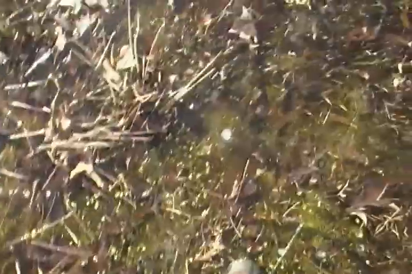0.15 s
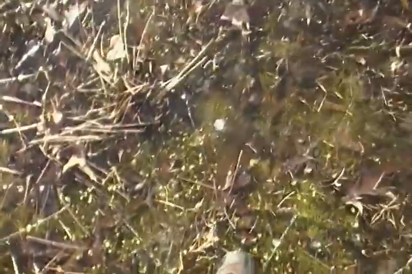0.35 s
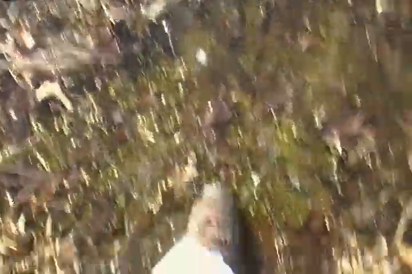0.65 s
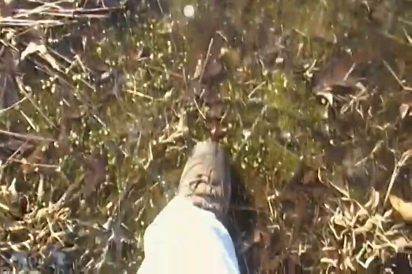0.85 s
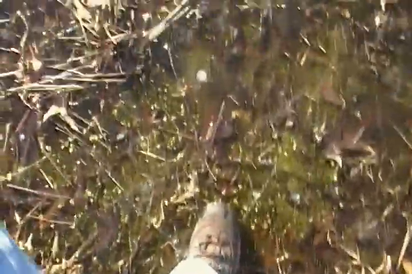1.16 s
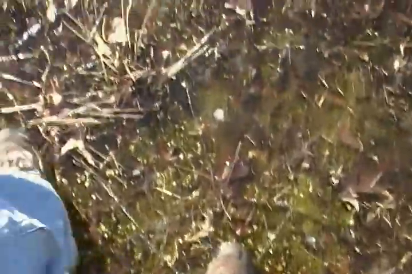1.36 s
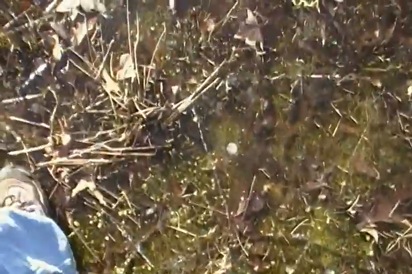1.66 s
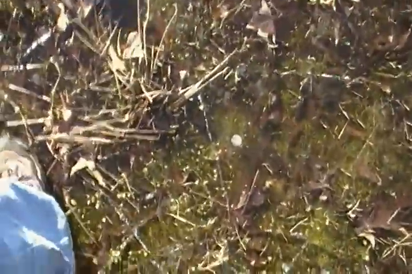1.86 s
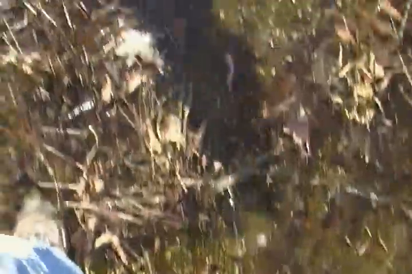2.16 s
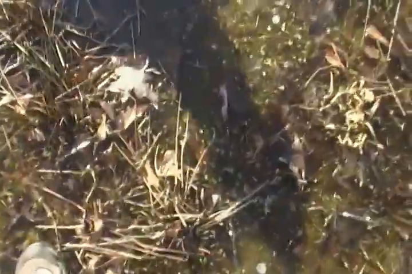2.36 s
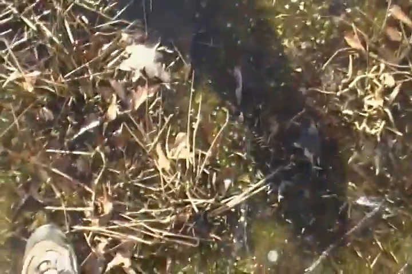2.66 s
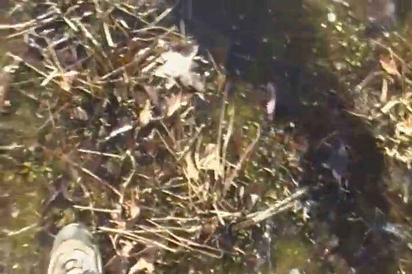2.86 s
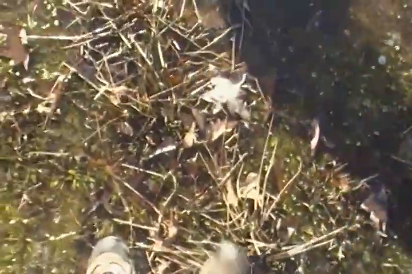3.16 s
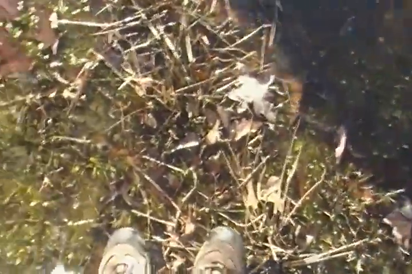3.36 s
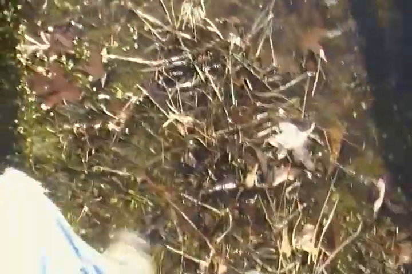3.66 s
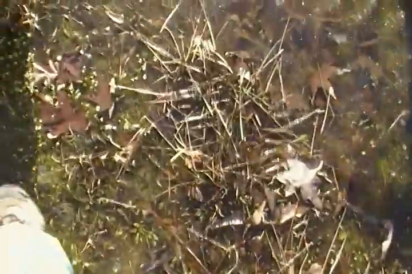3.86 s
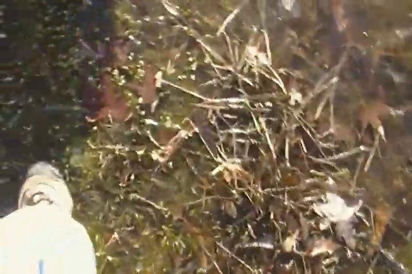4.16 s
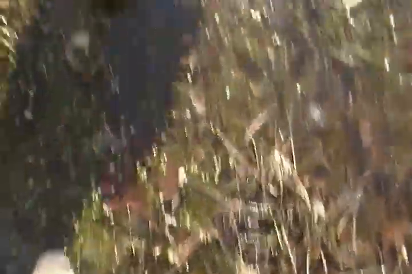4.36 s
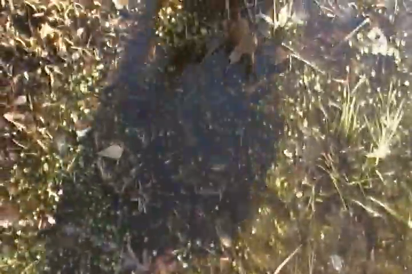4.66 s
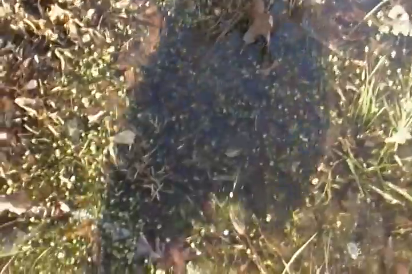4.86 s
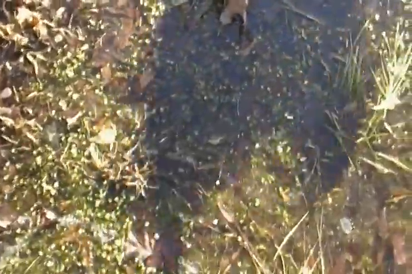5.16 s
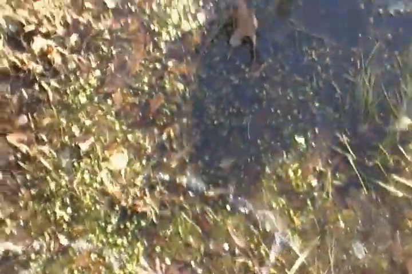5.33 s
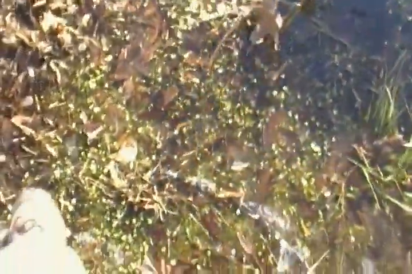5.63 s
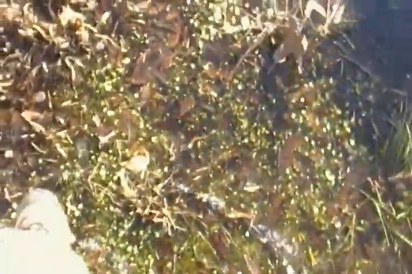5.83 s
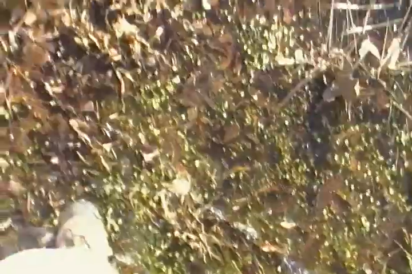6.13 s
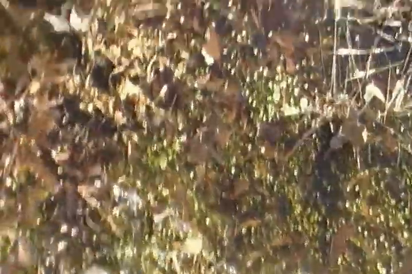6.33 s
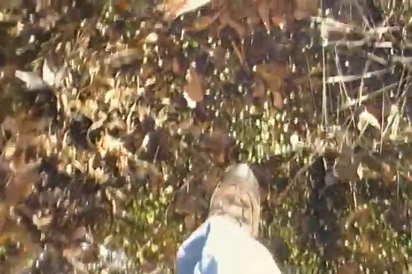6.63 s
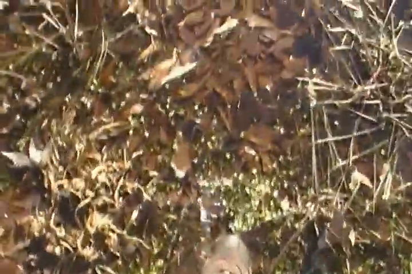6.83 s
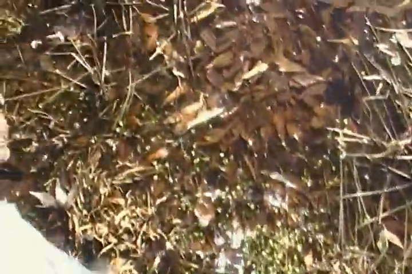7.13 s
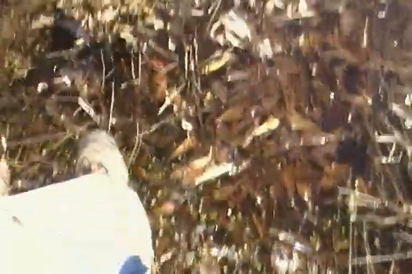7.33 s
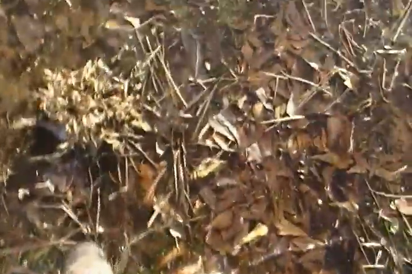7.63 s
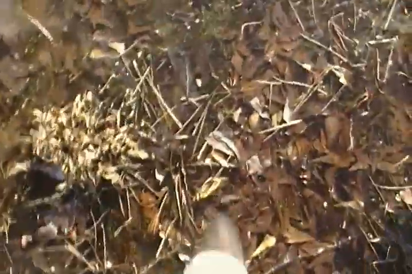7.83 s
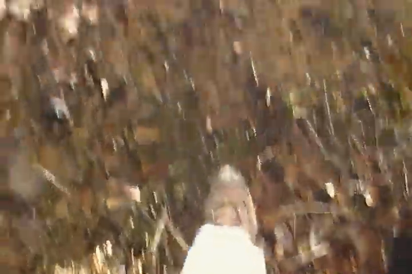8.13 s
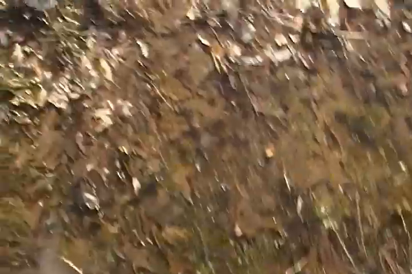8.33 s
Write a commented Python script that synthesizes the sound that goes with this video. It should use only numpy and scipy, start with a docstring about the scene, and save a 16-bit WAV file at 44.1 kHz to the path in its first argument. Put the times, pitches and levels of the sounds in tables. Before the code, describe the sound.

Outdoors on a shallow frozen pond, heard from just above the boots in wide stereo. A low gust brushes the microphone at the start as ice crackles densely until about 0.6 s, with sharp snaps. A hard boot clack lands near 0.8 s, another at 1.2; crunches swell around 1.25 and 1.7, then nearly quiet with tiny dry ticks until 2.2. A strong crack at 2.3 and a cluster of clacks with a scuff at 2.55 lead to a short lull around 3. From 3.2 the crushing is almost continuous, full of short falling cracks, crumbs and bright fizz, fizziest near 7. A faint low hum hides in the distant rumble mid-way. Low wind thumps begin at 5.7 and grow strong from 7.5 to the end. Crunching thins at 7.7-8.1, then a final clack, rasping scrape and crunch at 8.1-8.4. The sharpest peaks clip.

```python
"""A shallow pond under thin ice: slow steps, heard from a microphone just above the boots.
Each step crushes the crust: random breaks ring small plates into a dense crackle, with a bright fizz and coarse crumbs.
Larger cracks are short falling chirps, splinters are dry clicks; boots clack, scuff and scrape as shaped noise and blows.
Gusts and a handling bump, both fluctuating low noise, buffet the microphone over a far low rumble with a faint hum.
The sharpest peaks overload the recorder and clip."""
import sys
import numpy as np
from scipy import signal
from scipy.fft import rfft, irfft, next_fast_len
from scipy.io import wavfile
from scipy.ndimage import uniform_filter1d

SR = 44100
rng = np.random.default_rng(int(sys.argv[2]) if len(sys.argv) > 2 else 0)


def inscribe(sig):
    """Save sig as 16-bit PCM at rate SR to the path in sys.argv[1].

    A 1-D sig is mono; a 2-D sig holds one channel per row.
    Samples are clipped to [-1, 1] before scaling.
    """
    pcm = np.round(np.clip(np.atleast_2d(sig).T, -1, 1) * 32767)
    wavfile.write(sys.argv[1], SR, pcm.astype(np.int16))


N = 374320
TIME_S = np.arange(N) / SR
LEFT_RIGHT = np.array([[1], [-1]])


def undb(db):
    """Decibels to gain."""
    return 10 ** (np.asarray(db) / 20)


def unit(x):
    """Scale to rms 1."""
    return x / np.sqrt(np.mean(x ** 2))


def colour(x, points):
    """Shape a spectrum by frequency and dB points, joined along log frequency."""
    hz, db = np.transpose(points)
    size = next_fast_len(N + 4096)
    f = np.maximum(np.fft.rfftfreq(size, 1 / SR), 1)
    gain = undb(np.interp(np.log(f), np.log(hz), db))
    return irfft(rfft(x, size) * gain, size)[..., :N]


def ring(x, hz, q):
    """A damped resonance with gain 1 at its centre; q is at least 0.9."""
    b, a = signal.iirpeak(hz, max(q, 0.9), fs=SR)
    return signal.lfilter(b, a, x)


def butter(x, order, hz, kind):
    """Butterworth low-pass or high-pass."""
    return signal.sosfilt(signal.butter(order, hz, kind, fs=SR, output="sos"), x)


def add(track, s, sound):
    """Mix a sound in at a time in seconds."""
    i = int(np.clip(s * SR, 0, N))
    track[..., i:i + sound.shape[-1]] += sound[..., :N - i]


def swell(s, rise_s, hold_s, fall_s):
    """Exponential rise to full strength at s, a hold, an exponential fall."""
    near = slice(max(int((s - 1) * SR), 0), int((s + hold_s + 1) * SR))
    rise = (TIME_S[near] - s) / rise_s
    fall = (s + hold_s - TIME_S[near]) / fall_s
    out = np.zeros(N)
    out[near] = np.exp(np.minimum(rise, fall).clip(-30, 0))
    return out


# how far the two microphone ports differ: f/Hz, side gain/dB
PORT_SIDE = [(200, -17.5), (700, -11.5), (1200, -9.5), (2200, -8), (3400, -8.5), (5000, -4.5), (7000, 4.5),
             (8500, 0), (10000, -2), (12500, -0.5)]


def ports(mid, side):
    """Left and right: alike in the bass, mostly unrelated in the treble."""
    return mid + LEFT_RIGHT * colour(side, PORT_SIDE)


def fractures(per_s, spread_db):
    """Random tiny breaks of either sign, a few of them far stronger than the rest."""
    size = undb(spread_db * np.minimum(rng.exponential(size=N), 3.5))
    return (rng.random(N) < per_s / SR) * size * rng.choice([-1, 1], N)


def scatter(breaks, tail_s, share):
    """Each break is followed by a short hiss of splinters."""
    # a leaky sum of break power; tail_s is its decay time
    power = signal.lfilter([1 / (tail_s * SR)], [1, -np.exp(-1 / (tail_s * SR))], breaks ** 2)
    return breaks + share * np.sqrt(power) * rng.standard_normal(N)


def steady(x, window_s):
    """Even out the slow level and keep the grain."""
    power = uniform_filter1d(np.mean(x ** 2, axis=0), int(window_s * SR))
    power = np.abs(uniform_filter1d(power, int(window_s * SR / 2)))
    return x / np.sqrt(power + 1e-12)


# a sole loading the crust: t/s of full weight, build-up/s, hold/s,
# relative crunch level/dB (breaking plates), relative fizz level/dB (fine crystals)
PRESSES = [(0.065, 0.0058, 0.013, -26.5, -28), (0.152, 0.0068, 0.043, -31, -26.5),
           (0.228, 0.04, 0.15, -21.5, -25), (0.462, 0.036, 0.03, -25.5, -22), (0.51, .012, 0.039, -24, -25),
           (0.588, 0.022, 0.047, -36.5, -37), (0.773, 0.0077, 0.019, -27, -28.5),
           (1.01, 0.035, 0.071, -37, -42), (1.156, 0.0077, 0.011, -24.5, -26),
           (1.249, 0.04, 0.063, -24, -23.5), (1.387, .01, 0.011, -28.5, -27.5),
           (1.596, 0.08, 0.073, -27.5, -28), (1.67, 0.022, 0.036, -20, -25),
           (1.75, 0.0048, 0.0078, -29.5, -29), (2.09, 0.048, 0.026, -38, -48),
           (2.233, 0.029, 0.063, -28.5, -39), (2.294, 0.0015, 0.067, -18, -24),
           (2.433, 0.0047, 0.059, -26.5, -29), (2.539, 0.0011, 0.011, -20, -29),
           (2.699, 0.062, 0.069, -22.5, -22), (2.892, .02, 0.074, -34.5, -47.5),
           (3.177, 0.078, 0.011, -30, -39), (3.2, 0.004, 0.053, -21, -24.5),
           (3.272, 0.095, 0.13, -32, -33.5), (3.597, 0.092, 0.078, -22, -25),
           (3.705, 0.023, 0.073, -22, -23.5), (3.837, 0.011, 0.029, -26.5, -25.5),
           (3.914, 0.015, 0.036, -28, -32.5), (4.068, 0.054, 0.082, -20.5, -22.5),
           (4.207, 0.018, 0.026, -27, -25.5), (4.3, .003, 0.0064, -32, -31.5),
           (4.407, 0.033, 0.095, -55, -41.5), (4.61, 0.13, 0.043, -30, -33),
           (4.702, 0.023, 0.063, -17.5, -20.5), (4.843, 0.033, 0.2, -23.5, -22),
           (5.11, 0.034, 0.11, -28, -25.5), (5.305, 0.013, 0.089, -26, -25.5),
           (5.404, 0.024, 0.11, -20.5, -21), (5.617, 0.082, 0.063, -28.5, -23.5),
           (5.782, 0.14, 0.043, -24.5, -21), (5.9, 0.041, 0.03, -26, -26.5),
           (6.16, 0.27, 0.094, -26, -25.5), (6.28, 0.03, 0.061, -20.5, -21),
           (6.403, 0.032, 0.19, -24.5, -23.5), (6.636, 0.093, 0.15, -24.5, -22.5),
           (6.984, 0.09, 0.011, -19, -19.5), (7.055, 0.022, 0.047, -22.5, -17),
           (7.189, 0.12, 0.063, -22.5, -18.5), (7.319, 0.034, 0.13, -23.5, -22.5),
           (7.453, 0.025, 0.13, -28, -23.5), (7.662, 0.028, 0.028, -28, -35),
           (7.772, 0.036, 0.11, -35, -41), (8.128, 0.021, 0.014, -21.5, -22.5),
           (8.306, 0.0036, 0.025, -20.5, -28.5), (8.393, 0.024, 0.1, -26.5, -29.5)]
RELEASE_S, RELEASE_PER_HOLD = 0.022, 0.35  # the longer the press, the longer the crust takes to settle
CREEP_CRUNCH_DB, CREEP_FIZZ_DB = -52.5, -47  # relative levels under a boot at rest


def crushing():
    """Strength of crunch and fizz: the presses add up in power over the creep of the ice."""
    crunch = np.full(N, undb(CREEP_CRUNCH_DB) ** 2)
    fizz = np.full(N, undb(CREEP_FIZZ_DB) ** 2)
    for s, rise, hold, crunch_db, fizz_db in PRESSES:
        power = swell(s, rise, hold, RELEASE_S + RELEASE_PER_HOLD * hold) ** 2
        crunch += undb(crunch_db) ** 2 * power
        fizz += undb(fizz_db) ** 2 * power
    return np.sqrt(crunch), np.sqrt(fizz)


# spectrum of breaking plates: f/Hz, relative level/dB
CRUNCH_COLOUR = [(150, -69), (400, 3), (850, 1), (1200, 2.5), (1600, 6.5), (2200, 6.5), (2800, 5),
                 (4000, 5.5), (5200, -1), (7000, -9), (12000, -20)]
# spectrum of fizzing crystals: f/Hz, relative level/dB
FIZZ_COLOUR = [(2000, -5.5), (4500, 0.5), (6500, -6), (8500, -1.5), (10200, 0.5), (11500, -2.5),
               (13000, -15.5)]


def crust(crush, fizz, plate_q=4.2, plate_share=0.61, crunch_trim_db=-2.0, dense_db=-23,
          slips_per_s=130, slip_s=0.0036, patch_s=0.004):
    """Small plates snap in clusters and ring near shifting pitches; crystals fizz with the same breaks."""
    load = np.clip(crush / undb(dense_db), 0.08, 1)  # a light foot breaks fewer plates
    # the sole drops in sudden slips, each dying away quickly, over an even grind
    jolts = np.abs(fractures(slips_per_s, spread_db=2.0))
    slips = 0.7 + unit(signal.lfilter([1], [1, -np.exp(-1 / (slip_s * SR))], jolts))
    breaks = fractures(per_s=1700, spread_db=1.25) * (rng.random(N) < load) * slips
    # the break moves from patch to patch, each patch spanning neighbouring pitches
    pitches = np.geomspace(900, 5200, 16)
    patch_number = np.cumsum(rng.random(N) < 1 / (patch_s * SR))
    patch = rng.integers(0, len(pitches), N)[patch_number]
    which = (patch + rng.integers(-4, 5, N)) % len(pitches)
    plates = sum(ring(breaks * (which == k), hz, plate_q) / np.sqrt(hz) for k, hz in enumerate(pitches))
    body = plate_share * unit(plates) + unit(scatter(breaks, tail_s=0.0035, share=2.3))
    aside = scatter(breaks * rng.standard_normal(N), tail_s=0.0023, share=0.66)
    crunch = ports(unit(colour(body, CRUNCH_COLOUR)), unit(colour(aside, CRUNCH_COLOUR)))

    fine = breaks + fractures(per_s=2200, spread_db=5.6) * np.sqrt(slips)

    def crystals():
        """One independent grain of fizz on the shared breaks."""
        grains = scatter(fine * rng.standard_normal(N), tail_s=0.016, share=0.56)
        return unit(colour(grains, FIZZ_COLOUR))

    crystal_fizz = ports(crystals(), crystals())
    return steady(crunch, 0.05) * crush * undb(crunch_trim_db) + steady(crystal_fizz, 0.034) * fizz


# coarse crumbs break off by chance, more often and louder the harder the crust is crushed
CRUMBS_PER_S, CRUMB_FULL_DB = 45, -25  # highest rate, and the crush strength that reaches it
CRUMB_OVER_DB, CRUMB_SPREAD_DB = 1, 3.0  # level against the crush, and its spread
CRUMB_HZ, CRUMB_SPREAD_OCT, CRUMB_S = 2500, 0.55, 0.0014  # middle pitch, its spread, middle decay time


def crumbs(crush, q=3.4, skirt_q=0.9):
    """Each crumb grinds apart in a burst of a few milliseconds, at a pitch of its own."""
    t = np.arange(1024) / SR
    draws = rng.random((1000, 2))
    spread = rng.standard_normal((len(draws), 3)).clip(-2, 2)
    grit = rng.standard_normal((len(draws), 2, len(t)))
    out = np.zeros((2, N))
    for (when, chance), (size, pitch, length), noise in zip(draws, spread, grit):
        strength = crush[int(when * N)]
        rate = CRUMBS_PER_S * min(strength / undb(CRUMB_FULL_DB), 1)
        if chance < rate * TIME_S[-1] / len(draws):
            hz = CRUMB_HZ * 2 ** (CRUMB_SPREAD_OCT * pitch)
            age = t / (CRUMB_S * 2 ** (0.5 * length))
            burst = unit(ring(ring(noise, hz, q), hz, skirt_q)) * np.sqrt(age) * np.exp(1 - age)
            gain = strength * undb(CRUMB_OVER_DB + CRUMB_SPREAD_DB * size)
            add(out, when * TIME_S[-1], gain * burst)
    return ports(*out)


# gusts and handling bumps on the microphone: t/s of arrival, hold/s, relative level/dB;
# the short row at 7.938 s is a bump
GUSTS_AND_BUMPS = [(0.013, 0.23, -14.5), (0.29, 0.37, -25), (5.09, 0.13, -23), (5.735, 0.075, -13.5),
                   (5.88, 0.12, -24.5), (6.331, 0.034, -15), (6.539, 0.09, -14.5), (6.791, 0.03, -12),
                   (7.313, 0.037, -16), (7.498, 0.17, -10.5), (7.703, 0.042, -5), (7.825, 0.22, -9.5),
                   (7.938, 0.016, -7.5), (8.107, 0.36, -9)]
# spectrum of wind on the ports: f/Hz, relative level/dB
GUST_COLOUR = [(10, -4.5), (22, 5.5), (55, 4), (100, -4.5), (170, -16), (260, -28.5), (450, -35.5),
               (900, -49), (3000, -61)]
GUST_RISE_S, GUST_FALL_S = 0.046, 0.062
BREEZE_DB = -38.5  # relative level of the breeze between gusts


def wind_and_handling(buffet_db=3.0, trim_db=-1.6, lean_db=1.5, apart=0.89, flutter=3.35):
    """Eddies buffet each port, the left one harder; strong gusts flutter higher; a bump is shaped alike."""
    eddies = unit(colour(rng.standard_normal(N), [(1, -52), (14, 5), (40, -37), (200, -120)]))
    noise = rng.standard_normal((2, N))
    power = undb(BREEZE_DB) ** 2
    for s, hold, db in GUSTS_AND_BUMPS:
        power = power + (undb(db) * swell(s, GUST_RISE_S, hold, GUST_FALL_S)) ** 2
    force = np.sqrt(power)
    rush = colour(noise[0] + apart * LEFT_RIGHT * noise[1], GUST_COLOUR)
    gust = steady(rush * undb(buffet_db * eddies), 0.31)
    fluttering = flutter * force * ring(gust, 230, 1.0)
    return (gust + fluttering) * force * undb(trim_db + lean_db * LEFT_RIGHT)


# distant rumble of the open air: t/s, level/dB
RUMBLE = [(0, -28.5), (1.9, -26.5), (3.2, -28.5), (4.4, -29), (8.49, -37.5)]
# spectrum of the open air: f/Hz, relative level/dB
AIR_COLOUR = [(12, -4.5), (25, 3), (60, 1.5), (115, -2), (180, -8.5), (250, -10.5), (350, -17), (750, -19),
              (1200, -26), (4000, -37), (7000, -48), (11000, -49)]


def open_air(hum_hz=250, hum_db=-44):
    """A far low rumble of noise, nearly the same at both ports; a faint hum swells in it and fades."""
    noise = rng.standard_normal((3, N))
    rumble_s, rumble_db = np.transpose(RUMBLE)
    level = undb(np.interp(TIME_S, rumble_s, rumble_db))
    air = unit(colour(ports(noise[0], noise[1]), AIR_COLOUR)) * level
    hum = unit(ring(ring(noise[2], hum_hz, 18.0), hum_hz, 18.0))
    hum_swell = np.exp(-((TIME_S - 4.1) / 1.63) ** 2)
    return air + undb(hum_db) * hum * hum_swell


# loud single cracks: t/s, relative level/dB, ring f/Hz, amount of dry snap (0 to 1)
CRACKS = [(0.1526, 4.5, 3420, 0.37), (0.213, -4.5, 2390, 0.3), (0.2197, -8, 3800, .6),
          (0.257, -5, 3060, 0.4), (0.2664, -2, 1650, 0), (0.285, -3, 2060, 0.3), (0.324, -7.5, 2600, 0.4),
          (0.38, -8, 1720, 0.5), (0.341, -2.5, 2800, 1), (0.371, -12, 1410, 0.9), (0.3892, -2, 4000, 0.23),
          (.417, -6.5, 1500, 0.4), (0.439, -2, 4430, 0), (0.466, -4, 3880, 0.77), (0.482, -2.5, 3140, 0.45),
          (0.7589, -9, 4320, 0.55), (0.808, -10, 4300, 0.3), (1.177, -13, 1700, 0.5),
          (1.207, -6, 1330, 0.4), (1.2478, -11, 1700, 0.7), (1.5469, -10, 3320, 0.3),
          (1.5953, -5, 2840, 0.5), (1.702, -7, 1720, 0.5), (1.72, -2, 3350, 0.5), (1.756, -4.5, 3860, 0.45),
          (1.77, -10.5, 2450, 0.85), (2.2829, -7, 2600, .4), (2.299, 2.5, 3080, 0.1),
          (2.348, -7, 2360, 0.4), (2.3647, -1.5, 3220, 0), (2.3872, -5, 1440, 0.5),
          (2.4052, -9, 3200, 0.35), (2.4367, 0.5, 2400, 0.52), (2.592, -5.5, 2420, 0.5),
          (2.617, -13, 2600, .9), (2.6476, -3.5, 2600, 0.16), (2.6695, -5, 1730, 0.9),
          (2.7212, -1, 4530, 0.33), (3.111, -13.5, 3240, 0.2), (3.2007, 5, 1950, 0.52),
          (3.23, 1, 1950, 0.55), (3.284, -7, 2470, 0.8), (3.3116, -7, 4430, 0.7),
          (3.3508, -5.5, 4400, 0.74), (3.415, 6, 1900, 0.11), (3.444, -11, 3170, 0.6),
          (3.4574, 0.5, 2100, 0.34), (3.5227, -1.5, 1670, 0.36), (3.545, -1, 2010, 0.67),
          (3.5962, -3, 1990, 0.26), (3.642, -4, 3030, 0.5), (3.72, -2, 1510, 0.57), (3.7465, -6, 2620, 0.9),
          (3.7557, -5, 4220, 0.15), (3.7817, -7, 3870, 0.47), (3.9169, -3, 1720, 0.6),
          (4.045, 1.5, 1680, 0.34), (4.086, -3.5, 3780, 0.3), (4.163, -4, 2040, 0.2),
          (4.243, -8.5, 3150, 0.83), (4.4905, -2.5, 2420, 0), (4.531, -4, 1680, 0.22),
          (4.5645, -9, 1720, 0.4), (4.5774, -2.5, 1800, 0.32), (4.648, -11, 1940, 1),
          (4.671, -0.5, 2070, 0.64), (4.695, -7, 2800, .4), (4.7293, -2, 1840, 0.56),
          (4.7436, -6, 2060, 0.2), (4.768, -5, 3970, 0.7), (4.853, -9, 3430, 1), (4.9163, -9, 2540, 0.7),
          (4.938, -7, 2400, 0.76), (5.0102, -6, 4150, 0.7), (5.0808, -1, 4300, 0.33),
          (5.099, -15, 3920, 0.5), (5.162, -6.5, 3420, 0.6), (5.1774, -9, 2450, 0.6),
          (5.2263, -6.5, 3680, 0.1), (5.246, -5, 4100, 0.2), (5.268, -1.5, 4330, 0.5),
          (5.277, 1.5, 1260, .15), (5.3044, -4.5, 3250, 0.6), (5.317, -10, 1390, 0.4),
          (5.337, 0.5, 2870, 0.66), (5.3874, -1.5, 2990, 0.04), (5.408, -1.5, 1530, 0.2),
          (5.4708, -9.5, 1900, 0.6), (5.476, 0.5, 4200, 0.4), (5.579, -5, 4230, 0.1),
          (5.633, -10, 1230, 0.8), (5.649, -3.5, 3680, 0.15), (5.7405, -6, 2880, .6),
          (5.852, -2, 2330, 0.25), (5.896, -3.5, 2040, 0.7), (5.9392, -8, 2970, .5),
          (5.951, 0.5, 2760, 0.26), (5.992, -9, 3100, 0.96), (6.0184, -1, 3200, 0.23),
          (6.1518, -4.5, 3530, 0.46), (6.1832, -3.5, 2480, 0.6), (6.189, 0.5, 2110, 0.52),
          (6.562, -4.5, 2880, 0.5), (6.584, -8.5, 3700, 0.8), (6.667, -3, 1500, 0.4), (6.6865, -7, 2230, 0),
          (6.8023, 1.5, 2780, 0.27), (6.888, -4.5, 3600, 0.87), (6.9174, -1, 2000, 0.35),
          (6.957, 3, 1990, 0.5), (6.985, -2, 3500, 0.4), (7.0287, -3.5, 3180, 0.7),
          (7.032, -2.5, 1910, 0.3), (7.22, -7, 1537, 0.1), (7.2519, -16, 3000, .5), (7.3162, -8, 2240, 0.9),
          (7.3818, -5, 2800, 0.4), (7.4132, -4.5, 4050, 0.5), (7.4387, -4, 3190, 0.5),
          (7.688, -9, 2300, 0.64), (8.0397, -14, 2040, 0.33), (8.125, -5.5, 1310, 0.2),
          (8.32, -3, 1950, 0.35), (8.397, -6, 2870, 0.14), (8.408, -7, 4000, 0), (8.4212, -8, 1610, 0)]
# what the sheet radiates: f/Hz, gain/dB
CRACK_COLOUR = [(300, -4), (950, -1), (1500, -1.5), (4300, -1.5), (6000, -8), (7500, -8.5), (10000, -6)]


def cracks(lag_s=0.0005, ring_q=2.3, tail_q=0.9, snap_s=0.0028, tail=0.2, tail_s=0.0035, trim_db=0.5):
    """A crack rings a patch of the sheet; bending waves run faster at high pitch: a falling chirp."""
    t = np.arange(2048) / SR
    f = np.fft.rfftfreq(len(t), 1 / SR)
    impulse = 1.0 * (t == 0)
    mid, side = np.zeros((2, N))
    for s, db, hz, snap in CRACKS:
        path, lean, sign = rng.standard_normal(3)
        noise = rng.standard_normal((4, len(t)))
        lag = lag_s * np.exp(0.3 * path)  # travel time at 1 kHz, falling as 1 / sqrt(f)
        travel = np.exp(-4j * np.pi * lag * np.sqrt(1000 * f))
        # small patches ring for more cycles and snap harder; water damps the broad low ones
        brittle = np.sqrt(hz / 2400)
        q = ring_q * brittle / (1 + 2 * snap)  # a clean break rings longer than a splintering one
        patch = ring(impulse, hz, q)
        struck = (0.2 + 0.5 * snap) * patch + ring(patch, hz, q)
        chirp = irfft(rfft(struck) * travel)
        chirp *= np.sign(sign) / np.abs(chirp).max()
        snaps = snap * brittle * noise[:2] * np.exp(-t / snap_s)
        rattle = unit(ring(ring(noise[2:], hz, tail_q), hz, tail_q))
        tails = tail * brittle * rattle * np.exp(-t / tail_s) * (1 - np.exp(-t * hz))
        start = s - lag - 0.5 / hz
        gain = undb(db + trim_db)
        add(mid, start, gain * (chirp + snaps[0] + tails[0]))
        add(side, start, gain * (0.36 * lean * chirp + snaps[1] + tails[1]))
    return colour(ports(mid, side), CRACK_COLOUR)


# brittle splinters snapping on the surface: t/s, relative level/dB
TICKS = [(.511, -8), (0.598, -12), (.728, -22), (.74, -20), (.938, -17.5), (.955, -23), (1.014, -19),
         (1.05, -14), (1.114, -12), (1.15, -11), (1.349, -13.5), (1.945, -22), (1.994, -23.5),
         (2.045, -20.5), (2.088, -21), (2.221, -19), (2.231, -7), (2.858, -14), (2.885, -22), (2.962, -21),
         (3.163, -18), (3.375, -10), (5.557, -7.5), (6.084, -9.5), (6.121, -7), (6.261, -6), (7.117, -10),
         (7.728, -11), (7.801, -19)]


def ticks(decay_s=0.00053, after=0.11, after_s=0.0082, trim_db=2):
    """A splinter gives one dry bright click of noise with a faint rattle after it."""
    t = np.arange(1024) / SR
    fade = np.exp(-t / decay_s) + after * np.exp(-t / after_s)
    out = np.zeros((2, N))
    for s, db in TICKS:
        burst = rng.standard_normal((2, len(t)))
        add(out, s - decay_s, undb(db + trim_db) * burst * fade)
    return ports(*out)


# the boot's weight strikes the whole sheet: t/s, relative level/dB,
# hardness as top edge f/Hz, amount of dry snap (0 to 1)
CLACKS = [(0.7730, 0.5, 1720, 0.9), (0.8132, -1.5, 1940, 0.6), (1.1670, -3, 1480, 0.4),
          (2.5436, -1.5, 1520, 0.9), (2.5533, 0.5, 2500, 0.4), (2.5622, -2.5, 740, 0.2),
          (2.5783, -0.5, 2100, 0.34), (4.147, -10, 740, 0.2), (5.741, -9.5, 1490, 0.6),
          (5.814, -9.5, 685, 0.3), (8.136, -6, 1300, .5), (8.312, -3, 850, 0.2)]


def clacks(low_hz=260, snap_s=0.0011, water_hz=190, water=0.12, water_s=0.0059):
    """A hard blow bends the sheet in a band-limited pulse; the surface snaps and the water below thuds."""
    t = np.arange(2048) / SR
    impulse = 1.0 * (t == 0)
    thud = water * np.sin(2 * np.pi * water_hz * t) * np.exp(-t / water_s)
    out = np.zeros((2, N))
    for s, db, edge_hz, snap in CLACKS:
        bend = butter(butter(impulse, 5, edge_hz, "low"), 2, low_hz, "high")
        bend /= np.abs(bend).max()
        snaps = 0.5 * snap * rng.standard_normal((2, len(t))) * np.exp(-t / snap_s)
        blow = np.array([bend + thud + snaps[0], snaps[1]])  # mid, side
        add(out, s - 0.5 / edge_hz, undb(db) * blow)
    return ports(*out)


# the sole drags and the sheet grumbles under it: t/s, relative level/dB, decay/s, f/Hz
SCUFFS = [(2.542, -15, 0.017, 242), (3.375, -28.5, 0.033, 406), (5.745, -24, 0.034, 397),
          (6.647, -21.5, 0.047, 450), (7.465, -20.5, 0.029, 400), (8.149, -24, 0.068, 430),
          (8.311, -20, 0.008, 550)]


def scuffs(blows_per_s=300, grit=0.06, ease=0.22, width_q=1.0, trim_db=5.0):
    """A dragging sole gives the sheet a run of small dull blows."""
    t = np.arange(16384) / SR
    out = np.zeros(N)
    for s, db, length, hz in SCUFFS:
        blows = rng.standard_normal(len(t)) * (grit + (rng.random(len(t)) < blows_per_s / SR))
        shape = np.exp(-t / length) * (1 - np.exp(-t / (ease * length)))
        add(out, s, undb(db + trim_db) * unit(ring(blows, hz, width_q)) * shape)
    return out


def scrape(s=8.137, rise_s=0.0073, hold_s=0.0051, fall_s=0.031, hz=4400, db=-23):
    """A sole skids on landing: quick slips rasp in one bright resonance."""
    slips = scatter(fractures(per_s=1500, spread_db=4), tail_s=0.002, share=1)
    rasp = unit(ring(ring(slips, hz, 5.9), hz, 2.3))
    return rasp * undb(db) * swell(s, rise_s, hold_s, fall_s)


def scene():
    """Ice underfoot, wind and handling at the microphone, open country beyond."""
    crush, fizz = crushing()
    boots = crust(crush, fizz) + crumbs(crush) + clacks() + scuffs() + scrape()
    return boots + wind_and_handling() + open_air() + cracks() + ticks()


def record(dry):
    """The right port is a little brighter; the recorder rolls off the top, clips peaks and cuts off."""
    heard = dry - 0.33 * LEFT_RIGHT * ring(dry, 4760, 4.6)
    clipped = np.clip(butter(heard, 10, 12000, "low"), -1, 1)
    # steep cutoff at 12.8 kHz, 0.2 dB ripple, 80 dB down
    cutoff = signal.ellip(10, 0.2, 80, 12800, fs=SR, output="sos")
    return signal.sosfilt(cutoff, clipped)


dry = scene()
out = record(dry)
inscribe(out)
```